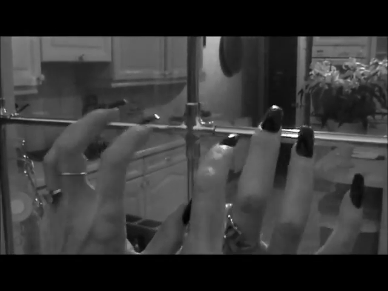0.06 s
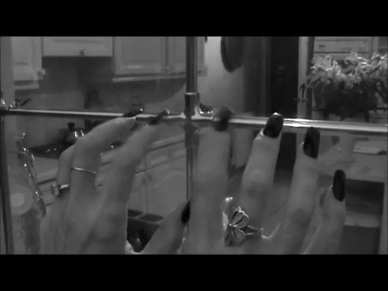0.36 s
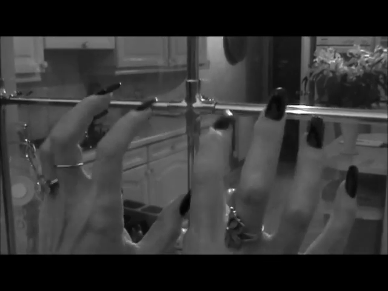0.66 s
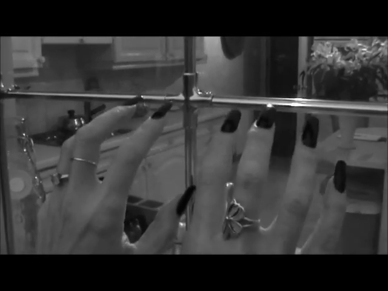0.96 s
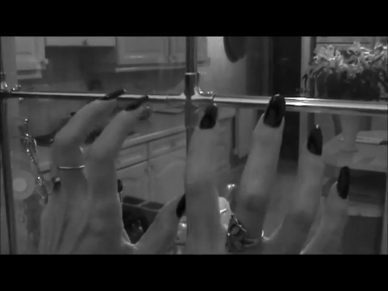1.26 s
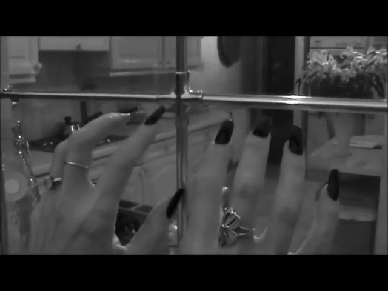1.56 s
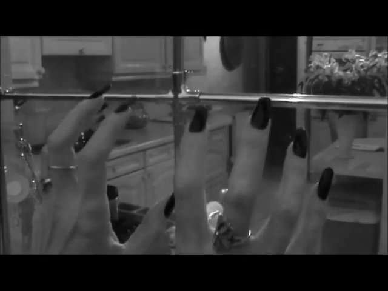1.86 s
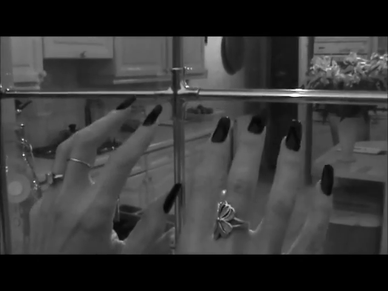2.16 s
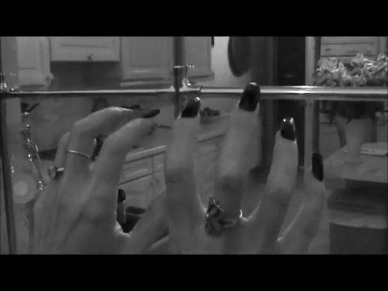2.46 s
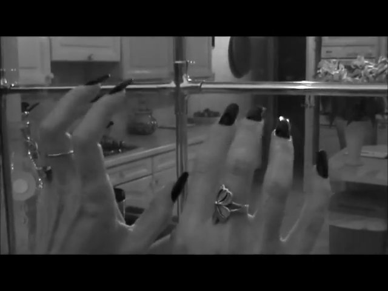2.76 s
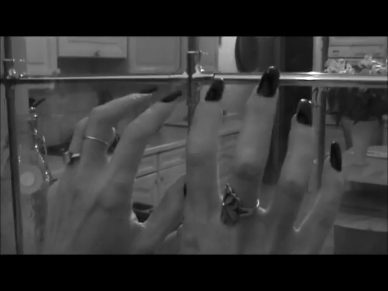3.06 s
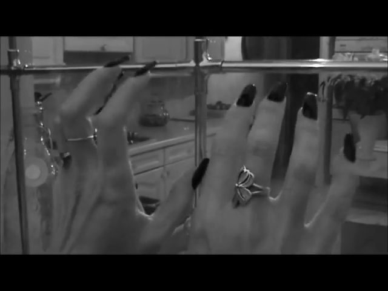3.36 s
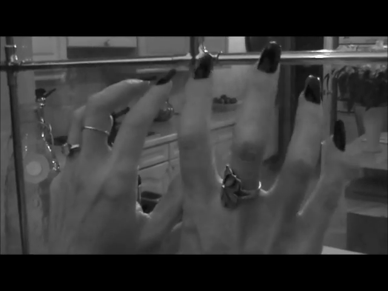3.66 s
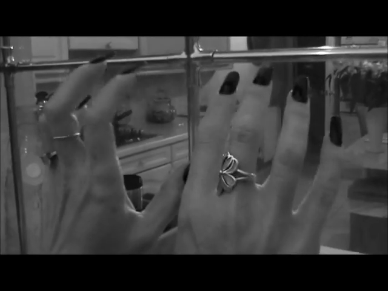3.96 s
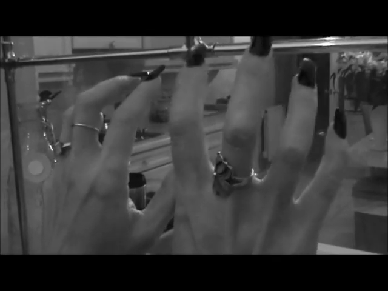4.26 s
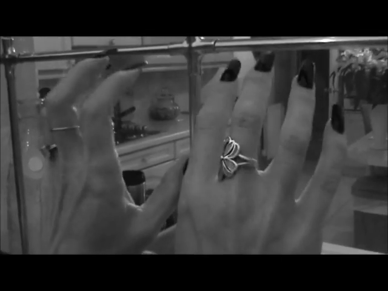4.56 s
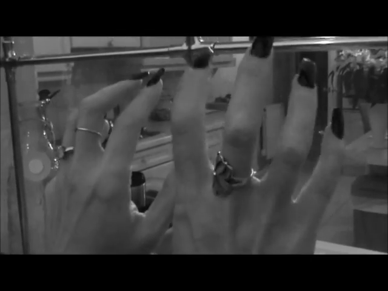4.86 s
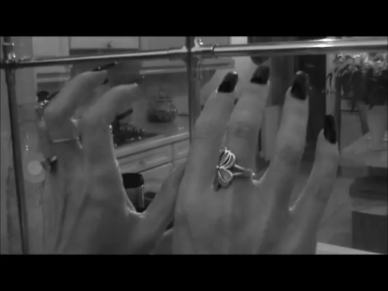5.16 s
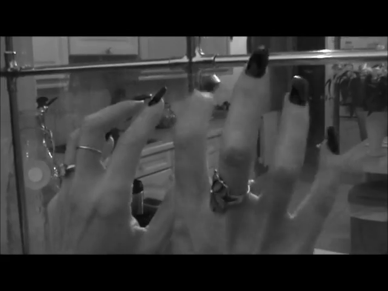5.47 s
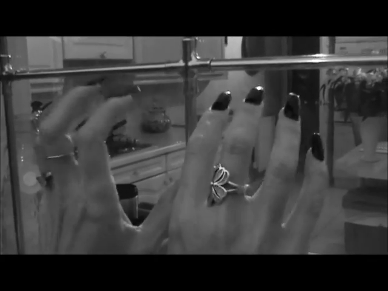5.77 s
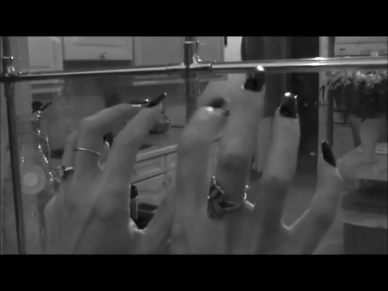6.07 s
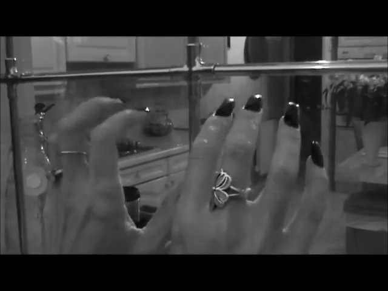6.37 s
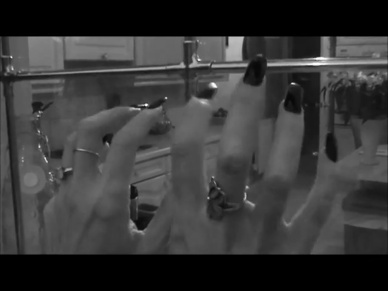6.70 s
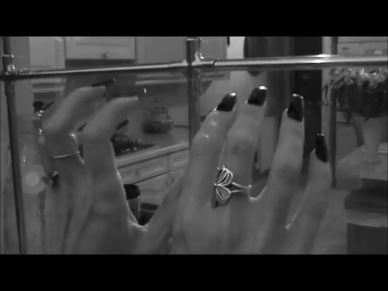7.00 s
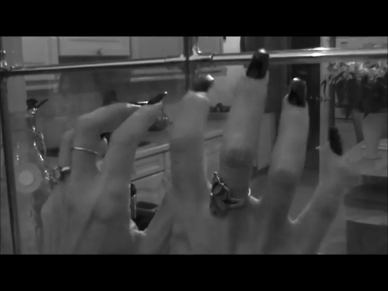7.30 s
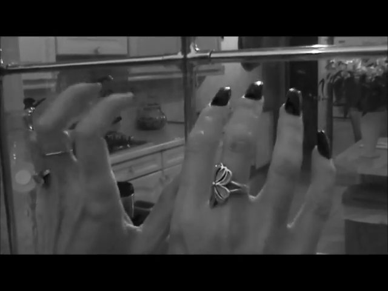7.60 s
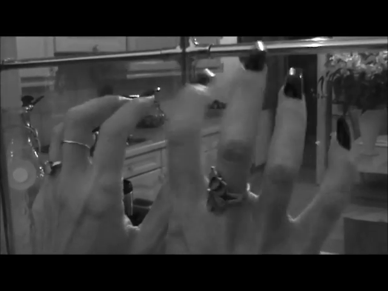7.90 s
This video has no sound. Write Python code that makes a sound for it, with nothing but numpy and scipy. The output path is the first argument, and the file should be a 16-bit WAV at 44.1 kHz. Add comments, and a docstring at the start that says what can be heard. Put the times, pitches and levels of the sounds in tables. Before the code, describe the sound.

A ventilator hums faintly and steadily in a kitchen for the whole eight seconds. At about 0.3 seconds, long fingernails start drumming on a glass pane close to the microphone. Each roll is three or four quick, bright clicks, and each click rings the glass very briefly. Until a little after 2 seconds the two hands overlap, giving clusters roughly every half second. From about 2.5 seconds they alternate, with a new roll about three times a second, up to the end. One finger also lands with its pad, adding a low thump that is heavier from about 3 seconds on. A lifted nail lightly ticks the glass around 2.5, 6.5 and 7.2 seconds. The pane clacks dully in its frame, softly near 3.1 seconds, then increasingly loudly at about 6.5, 6.8 and 7.4 seconds.

```python
"""A ventilator hums steadily in a kitchen. Almost at once, eight long fingernails start to drum on a
glass pane close by, four to a roll: each impact clicks, echoes from the frame and rings the glass briefly.
For two seconds the hands overlap, then they alternate, and now and then a lifted nail brushes the glass.
One finger also lands with its pad and thumps the pane, harder from about 3 s on.
The pane clacks dully in its frame, once near 3 s and three times towards the end."""
import sys
import numpy as np
from scipy import signal
from scipy.fft import rfft, irfft, next_fast_len
from scipy.io import wavfile

SR = 44100
rng = np.random.default_rng(int(sys.argv[2]) if len(sys.argv) > 2 else 0)


def inscribe(sig):
    """Save sig as 16-bit PCM at rate SR to the path in sys.argv[1].

    A 1-D sig is mono; a 2-D sig holds one channel per row.
    Samples are clipped to [-1, 1] before scaling.
    """
    pcm = np.round(np.clip(np.atleast_2d(sig).T, -1, 1) * 32767)
    wavfile.write(sys.argv[1], SR, pcm.astype(np.int16))


N = 350154
TAP_SAMPLES = 12288
AGE_S = np.arange(TAP_SAMPLES) / SR
TAP_HZ = np.fft.rfftfreq(TAP_SAMPLES, 1 / SR)
LEFT, RIGHT = 0, 1
PER_HAND, HEAVY_FINGER = 4, 2


def amp(db):
    """Amplitude ratio: tenfold for every 20 dB."""
    return 10 ** (np.asarray(db) / 20)


def at_time(curve, time_s):
    """Linear interpolation in time."""
    return np.interp(time_s, *np.transpose(curve))


def at_hz(curve, hz):
    """Interpolation on a logarithmic frequency axis."""
    knots_hz, values = np.transpose(curve)
    return np.interp(np.log(hz + 1), np.log(knots_hz + 1), values)


def add(out, start_s, sound):
    """Superposition: a stereo sound adds to the mix from start_s on."""
    part = out[:, round(start_s * SR):][:, :TAP_SAMPLES]
    part += sound[:, :part.shape[1]]


def unit_energy(x):
    """Normalisation to a mean energy of 1 per channel."""
    return x / np.sqrt(np.sum(x ** 2, axis=(-2, -1), keepdims=True) / 2)


def low_pass(hz, edge_hz, order):
    """Butterworth gain: 6 dB per octave and order above the edge."""
    return 1 / np.sqrt(1 + (hz / edge_hz) ** (2 * order))


def minimum_phase(gain):
    """Causality: the response of this gain whose energy arrives earliest."""
    cepstrum = irfft(np.log(np.maximum(gain, 1e-6)))
    cepstrum[1:TAP_SAMPLES // 2] *= 2
    cepstrum[TAP_SAMPLES // 2 + 1:] = 0
    return np.exp(rfft(cepstrum))


def panned(db):
    """Level difference: gains that put left db above right."""
    return amp(np.array([db, -db]) / 2)


def correlate(pair, coherence, hz):
    """Partial coherence: two independent spectra mix as mid and side."""
    angle = np.arccos(np.clip(at_hz(coherence, hz), -1, 1)) / 2
    mid, side = pair[..., 0, :] * np.cos(angle), pair[..., 1, :] * np.sin(angle)
    return np.stack([mid + side, mid - side], axis=-2)


# spectrum of the ventilator: frequency_hz, gain_db
HUM_SPECTRUM = [(25, -10), (50, -0.5), (130, -0.5), (300, -7.5), (620, -4.5), (950, 0.5), (1400, -6),
                (1900, -12), (2500, -21), (3300, -25.5), (8000, -30), (15000, -35.5)]
# its likeness in left and right: frequency_hz, coherence
HUM_COHERENCE = [(40, 1), (130, 1), (950, 0.57), (4000, 0.51)]
# its slow drift: time_s, level_db
HUM_LEVEL = [(0, -39.5), (1.5, -42), (7.9, -40)]
def ventilator_hum():
    """Broadband ventilation noise, strongest and most coherent at low frequencies."""
    size = next_fast_len(N)
    hz = np.fft.rfftfreq(size, 1 / SR)
    noise = correlate(rfft(rng.standard_normal((2, size))), HUM_COHERENCE, hz)
    air = irfft(noise * amp(at_hz(HUM_SPECTRUM, hz)), size)[:, :N]
    return air / air.std() * amp(at_time(HUM_LEVEL, np.arange(N) / SR))


# damping of glass and frame: frequency_hz, t60_s
DAMPING = [(200, .2), (1000, 0.13), (3500, 0.053), (10000, 0.048)]
# likeness of the ringing in left and right: frequency_hz, coherence (capped at 1)
RING_COHERENCE = [(150, 1.3), (300, 1.1), (500, 0.7), (1000, 0.27), (4000, 0.82), (10000, 0.67)]
# balance of the ringing: frequency_hz, left_minus_right_db
RING_BALANCE = [(170, 1), (300, -3), (500, -4), (1300, -3.5), (3000, -0.2)]
def dense_modes(count, fresh_share):
    """Modal overlap: crowded modes merge into decaying noise; one spectrum per impact."""
    repeated = np.sqrt(1 - fresh_share) * rng.standard_normal((2, TAP_SAMPLES))  # hits near one spot
    fresh = np.sqrt(fresh_share) * rng.standard_normal((count, 2, TAP_SAMPLES))
    hz, age_s, bands = signal.stft(repeated + fresh, SR, nperseg=128)
    decay = amp(-60 * age_s / at_hz(DAMPING, hz)[:, None])
    tails = signal.istft(bands * decay, SR, nperseg=128)[1][..., :TAP_SAMPLES]
    return correlate(rfft(tails), RING_COHERENCE, TAP_HZ) * panned(at_hz(RING_BALANCE, TAP_HZ))


# knocks of the pane in its frame: start_s, level_db, centre_hz
CLACKS = [(3.139, -15, 1320), (6.510, -6, 1750), (6.802, 0, 1220), (7.389, 4, 1340)]
def frame_clacks(log_width=0.42, t60_s=0.074):
    """Damped vibration: the pane knocks in its frame, and one band of modes dies away fast."""
    out = np.zeros((2, N))
    decay = amp(-60 * AGE_S / t60_s)
    for (start_s, level_db, centre_hz), modes in zip(CLACKS, dense_modes(len(CLACKS), fresh_share=1)):
        band = minimum_phase(1 / (1 + (np.log((TAP_HZ + 1) / centre_hz) / log_width) ** 4))
        add(out, start_s, amp(level_db) * unit_energy(irfft(modes * band) * decay))
    return out


def nail_colour(nail_hz, peak_db, edge_hz, log_width=0.083):
    """Resonance: a nail has one broad peak and a treble edge."""
    peak = np.exp(-.5 * (np.log((TAP_HZ + 1) / nail_hz) / log_width) ** 2)
    return amp(peak_db * peak) * low_pass(TAP_HZ, edge_hz, order=5)


# spectrum of a nail's contact: frequency_hz, gain_db
CLICK_SPECTRUM = [(100, -31), (900, -10), (2200, -19), (4500, -1), (5700, 2), (9000, -3.5), (12000, -0.5),
                  (14000, -8), (16000, -9)]
def nail_click(nail_hz, peak_db, edge_hz, scatter_db=-5, scatter_t60_s=.014):
    """Impulse response: one hard contact, then brief scattering between hand and glass."""
    detune = np.exp(0.021 * rng.standard_normal(2))  # the nail lands a little differently each time
    nail = nail_colour(nail_hz * detune[0], peak_db, edge_hz * detune[1])
    colour = minimum_phase(amp(at_hz(CLICK_SPECTRUM, TAP_HZ)) * nail)
    tail = unit_energy(rng.standard_normal((2, TAP_SAMPLES)) * amp(-60 * AGE_S / scatter_t60_s))
    scatter = amp(scatter_db) * correlate(rfft(tail), RING_COHERENCE, TAP_HZ)
    return unit_energy(irfft(colour * (1 + scatter)))


# a lifted nail brushes the glass: start_s, relative_level_db
GRAZES = [(2.441, -51), (2.515, -38.5), (6.51, -35.5), (7.247, -48)]
def nail_grazes(gain_db=22):
    """Grazing contact: with no weight behind it, a nail only ticks faintly."""
    out = np.zeros((2, N))
    for start_s, level_db in GRAZES:
        tick = nail_click(nail_hz=6000, peak_db=2, edge_hz=10000, scatter_db=1, scatter_t60_s=0.02)
        add(out, start_s, amp(level_db + gain_db) * tick)
    return out


def frame_echo(delay_s=0.0021, spread_s=0.00068, centre_hz=4300):
    """Reflection: a bending wave returns from the frame as a short packet."""
    phase = rng.uniform(0, 2 * np.pi) + .5 * rng.standard_normal((2, 1))
    pitch_hz = centre_hz * np.exp(0.069 * rng.standard_normal())
    packet = np.exp(-.5 * ((AGE_S - delay_s) / spread_s) ** 2)
    return unit_energy(packet * np.sin(2 * np.pi * pitch_hz * AGE_S + phase))


# distinct modes of the pane: pitch_hz, left_hand_db, right_hand_db, t60_s
PANE_MODES = [(132.3, -24, -25.5, 0.35), (193.5, -19.5, -11.5, 0.31), (253, -18.5, -23, 0.27),
              (306.5, -19.5, -26.5, 0.15), (381.4, -24.5, -38, 0.12), (427, -12.5, -25, 0.15),
              (495, -17, -15.5, .11), (568, -23.5, -36, 0.23), (697.4, -29.5, -28.5, 0.32),
              (862, -16.5, -27, 0.11), (1062, -17.5, -25, 0.17), (1274, -13.5, -18.5, 0.075),
              (1409, -10, -17.5, 0.051), (3030, -28, -15, 0.071), (3395, -13, -13.5, 0.05),
              (3670, -11.5, -10.5, 0.057), (4050, -11.5, -7.5, 0.069), (4400, -18, -11, 0.058),
              (5370, -1, -15, 0.023), (5740, -16.5, -10, 0.037)]
def pane_modes(count, hand, soft_hz, split_hz=2000, vary_db=2):
    """Normal modes: the finger's weight drives the low ones, its nail the high ones."""
    hz, left_db, right_db, t60_s = np.transpose(PANE_MODES)
    weight_drive = (hz < split_hz) * low_pass(hz, soft_hz, order=3)
    nail_drive = hz >= split_hz
    strength = amp((left_db, right_db)[hand] + vary_db * rng.standard_normal((count, 1, len(hz))))
    # short bending waves reach left and right out of step
    skew = np.arccos(np.clip(at_hz(RING_COHERENCE, hz), -1, 1)) / 2 * rng.choice([-1, 1], len(hz))
    phase = rng.uniform(0, 2 * np.pi, len(hz)) + np.array([skew, -skew])
    waves = np.exp(2j * np.pi * hz[:, None] * AGE_S) * amp(-60 * AGE_S / t60_s[:, None])
    build_up = 1 - np.exp(-AGE_S / 0.00043)
    struck = strength * panned(at_hz(RING_BALANCE, hz)) * np.exp(1j * phase)
    return np.array([((struck * drive) @ waves).imag * build_up for drive in (weight_drive, nail_drive)])


# bright ring of the glass: frequency_hz, gain_db
GLASS_SPECTRUM = [(1500, -33.5), (2300, -11), (3100, -3.5), (4200, -4), (5600, 1), (6500, -9), (11000, -15),
                  (15000, -25)]
# low body of the pane: frequency_hz, gain_db
BODY_SPECTRUM = [(30, -21), (70, -13), (150, -3.5), (300, -5.5), (480, 1), (750, -4.5), (1300, 2),
                 (1900, -2.5), (3000, -26.5)]
# touch of each finger, left hand then right, in rolling order; levels are relative:
# strength_db, nail_hz, peak_db, edge_hz, ring_db, body_db, soft_hz, pan_db
FINGERS = [(-23, 6900, 4.5, 11000, 0.5, -4, 970, 1.5), (-26.5, 6000, -4, 10000, 5, 8.5, 1470, 1),
           (-22, 6150, 2, 10400, 3.5, 14.5, 810, 1.5), (-19.5, 8600, 8, 9300, -1, 1.5, 8700, 1),
           (-19.5, 10400, 9, 12000, -5.5, -7, 3000, -0.5), (-16, 5470, 5, 12500, -3, -5, 2300, -1),
           (-15.5, 9300, 2.5, 10000, 0, -0.5, 1400, 0.5), (-16, 7550, 11.5, 10500, -3, -3, 2100, 1.5)]
def finger_taps(finger, count, click_gain_db=20, echo_gain_db=13, glass_gain_db=16,
                body_gain_db=11, modes_gain_db=-1):
    """Impact excitation: hard contact gives a tap's bright part, soft contact its low-passed thump."""
    strength_db, nail_hz, peak_db, edge_hz, ring_db, body_db, soft_hz, pan_db = FINGERS[finger]
    clicks = np.array([amp(click_gain_db) * nail_click(nail_hz, peak_db, edge_hz)
                       + amp(echo_gain_db + ring_db) * frame_echo() for _ in range(count)])
    modes = dense_modes(count, fresh_share=0.66)
    glass_colour = amp(at_hz(GLASS_SPECTRUM, TAP_HZ)) * nail_colour(nail_hz, peak_db, edge_hz)
    body_colour = amp(at_hz(BODY_SPECTRUM, TAP_HZ)) * low_pass(TAP_HZ, soft_hz, order=3)
    glass = amp(glass_gain_db + ring_db) * unit_energy(irfft(modes * minimum_phase(glass_colour)))
    body = amp(body_gain_db) * unit_energy(irfft(modes * minimum_phase(body_colour)))
    low_modes, high_modes = amp(modes_gain_db) * pane_modes(count, finger // PER_HAND, soft_hz)
    bright = (clicks + glass) * panned(pan_db)[:, None] + amp(ring_db) * high_modes
    thump = amp(body_db) * (body + low_modes)
    return amp(strength_db) * bright, amp(strength_db) * thump


# rolls of three or four fingers: start_s, hand, accent_db, waits_s (from finger to finger)
ROLLS = [(0.2599, RIGHT, 1.5, (.0761, .0764, .097)), (0.2975, LEFT, 1, (.0385, .0663, .0905)),
         (0.7986, RIGHT, 2, (.0663, .0745, .1231)), (0.855, LEFT, .5, (.0379, .0445)),
         (1.3662, RIGHT, .5, (.0606, .0848, .0969)), (1.4076, LEFT, .5, (.0277, .0773)),
         (1.9324, RIGHT, 1, (.0726, .0725, .144)), (1.9924, LEFT, -4, (.0664, .0529)),
         (2.5661, RIGHT, 3, (.0603, .0772, .1164)), (2.9412, LEFT, -2.5, (.0575, .0267, .1142)),
         (3.1484, RIGHT, -2, (.1178, .0473, .0618)), (3.5384, LEFT, -1, (.0745, .049, .08)),
         (3.7604, RIGHT, -1.5, (.0976, .0595, .0635)), (4.146, LEFT, 1, (.0559, .0516, .0729)),
         (4.3774, RIGHT, 2.5, (.0926, .0682, .0503)), (4.762, LEFT, -.5, (.0467, .0497, .0892)),
         (4.9944, RIGHT, 1.5, (.0664, .0828, .0544)), (5.364, LEFT, 2.5, (.071, .0551, .0657)),
         (5.6142, RIGHT, 2, (.0814, .0677, .0522)), (6.0165, LEFT, .5, (.0589, .0454, .0732)),
         (6.2462, RIGHT, -.5, (.0816, .0742, .0535)), (6.6378, LEFT, -.5, (.0526, .0546, .0565)),
         (6.8851, RIGHT, -2.5, (.0507, .0609, .0648)), (7.2131, LEFT, 1.5, (.0711, .0428, .0606)),
         (7.474, RIGHT, 2, (.052, .0735, .058)), (7.825, LEFT, 1, (.0671, .0439))]
# how hard both hands play: time_s, gain_db
EFFORT = [(.4, 1.5), (1.6, -0.5), (2.2, -0.5), (2.7, .7), (3.9, -0.5), (5, -0.97), (5.8, 0.44), (6.4, .5),
          (7.6, -0.56)]
def landings():
    """Impulse train: each roll drops one hand's fingers in turn and accents the first."""
    for start_s, hand, accent_db, waits_s in ROLLS:
        for turn, time_s in enumerate(start_s + np.cumsum([0, *waits_s])):
            level_db = at_time(EFFORT, time_s) + (accent_db if turn == 0 else 0)
            yield time_s, PER_HAND * hand + turn, level_db


# how heavily the thumping finger's pad follows its nail: time_s, gain_db
PAD_WEIGHT = [(.4, -1.5), (.95, -7.5), (1.5, -2), (2.1, -12.5), (3, 2.5), (7.3, 3.5)]
def drumming(uneven_db=0.36):
    """Linear response: each finger's own sound scales with its force, the heavy thump with its pad."""
    out = np.zeros((2, N))
    for finger in range(len(FINGERS)):
        taps = [(time_s, level_db) for time_s, who, level_db in landings() if who == finger]
        for (time_s, level_db), bright, thump in zip(taps, *finger_taps(finger, len(taps))):
            pad_db = at_time(PAD_WEIGHT, time_s) if finger == HEAVY_FINGER else 0
            force = amp(level_db + uneven_db * rng.standard_normal())
            add(out, time_s, force * (bright + amp(pad_db) * thump))
    return out


def scene():
    """Superposition: the pressures of fingers, pane and ventilator add."""
    return drumming() + nail_grazes() + frame_clacks() + ventilator_hum()


# phase of the left microphone port ahead of the right: frequency_hz, lead_rad
PORT_LEAD = [(0, -0.78), (430, -0.065), (690, -0.57), (1290, 0.9), (4570, 0.67), (6720, 1.38), (7670, 0.85),
             (9910, 0.33), (16600, -0.13)]
def record(dry):
    """Phase difference: two ports hear the sound out of step, clipped at full scale and band-limited."""
    size = next_fast_len(N + TAP_SAMPLES)
    hz = np.fft.rfftfreq(size, 1 / SR)
    lead = np.exp(.5j * at_hz(PORT_LEAD, hz) * np.array([[1], [-1]]))
    spectrum = rfft(np.clip(dry, -1, 1), size)
    return irfft(spectrum * lead * low_pass(hz, edge_hz=16000, order=90), size)[:, :N]


dry = scene()
out = record(dry)
inscribe(out)
```